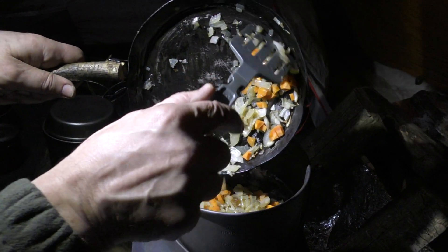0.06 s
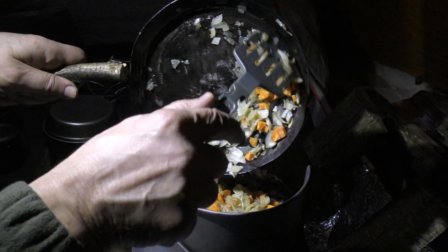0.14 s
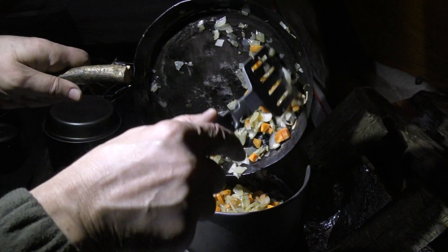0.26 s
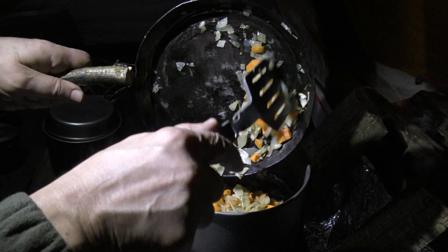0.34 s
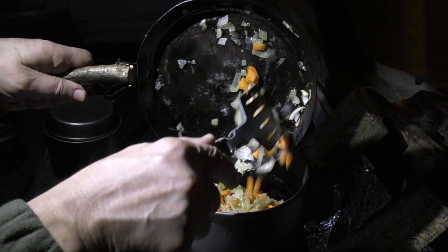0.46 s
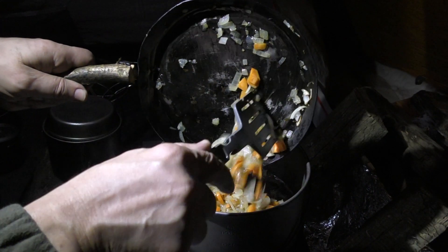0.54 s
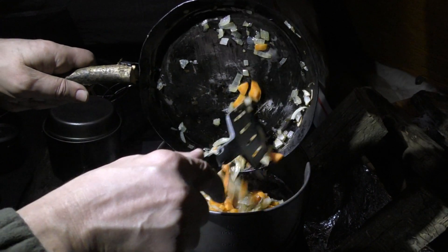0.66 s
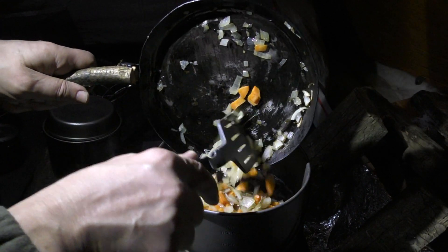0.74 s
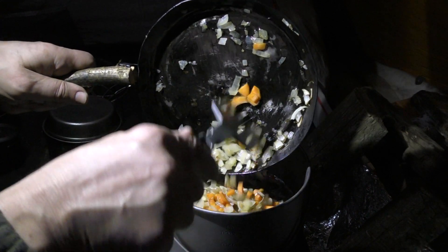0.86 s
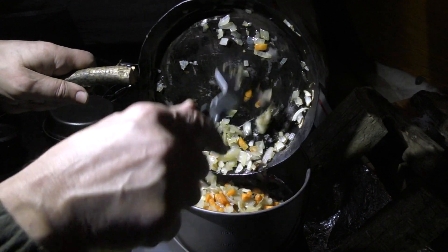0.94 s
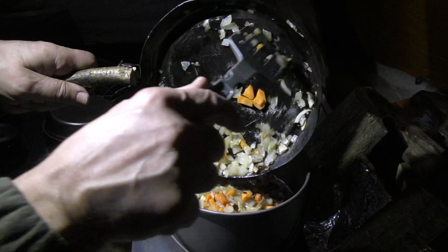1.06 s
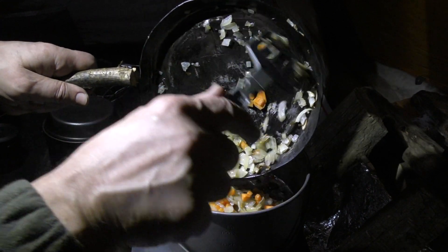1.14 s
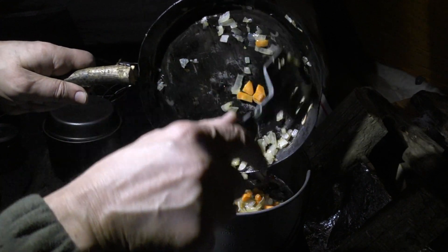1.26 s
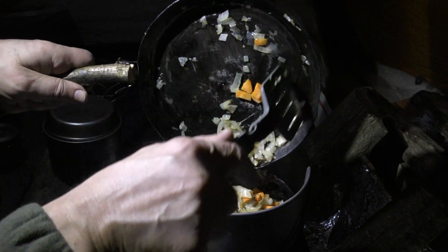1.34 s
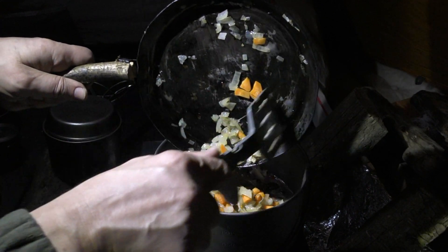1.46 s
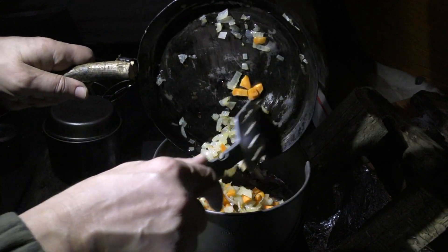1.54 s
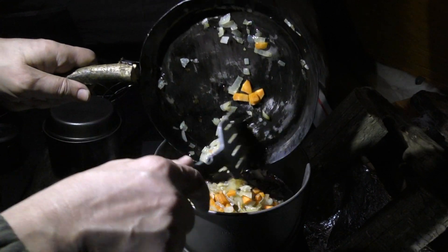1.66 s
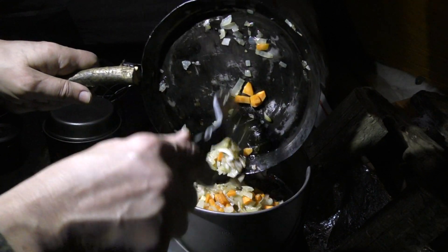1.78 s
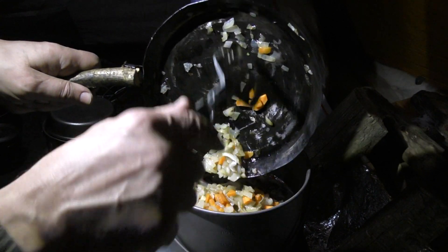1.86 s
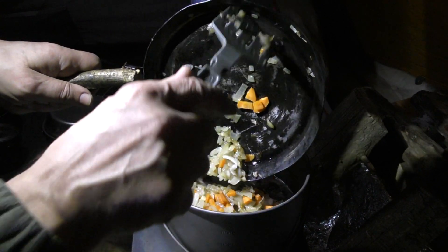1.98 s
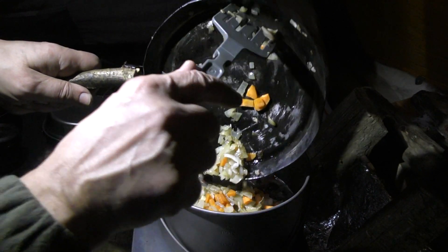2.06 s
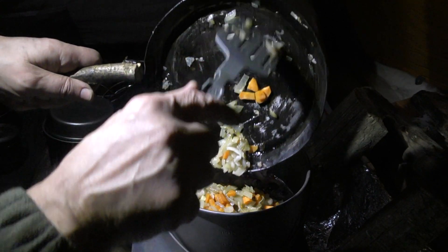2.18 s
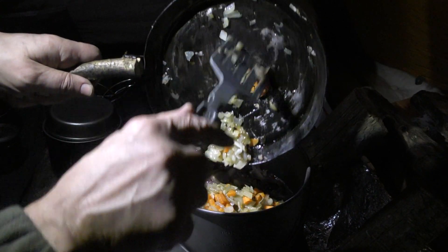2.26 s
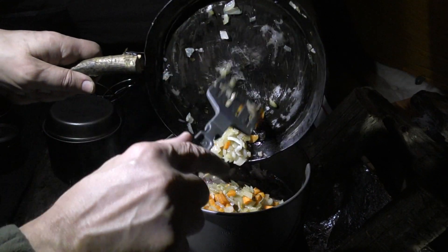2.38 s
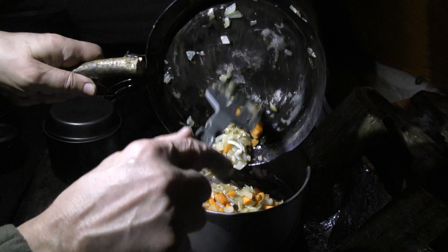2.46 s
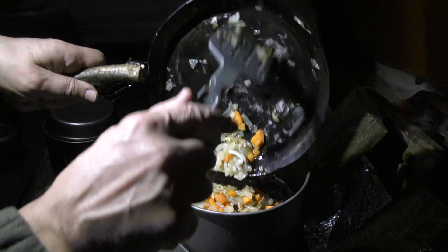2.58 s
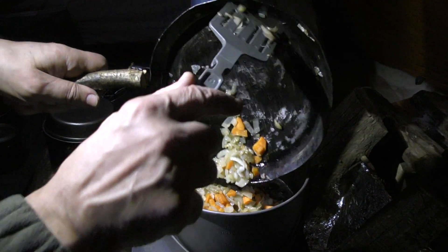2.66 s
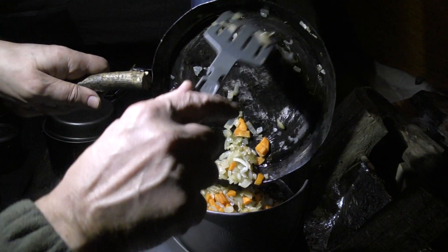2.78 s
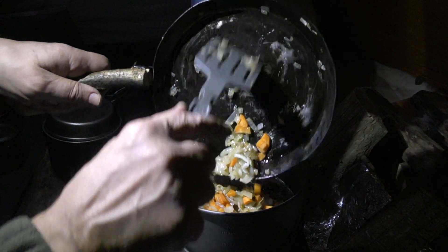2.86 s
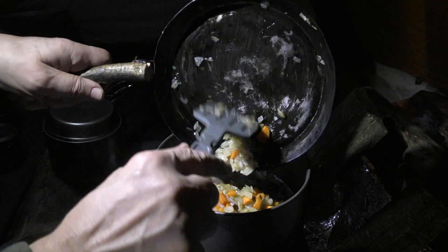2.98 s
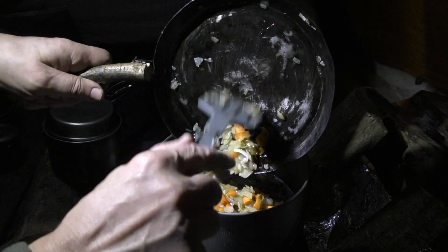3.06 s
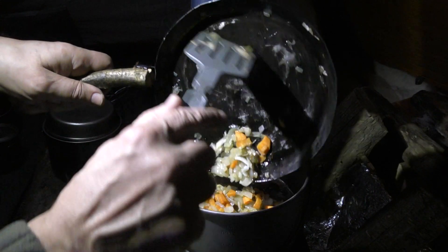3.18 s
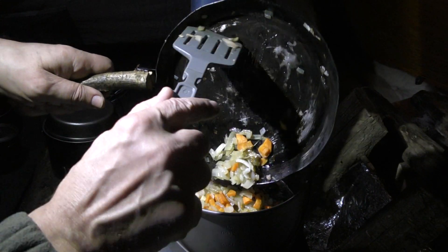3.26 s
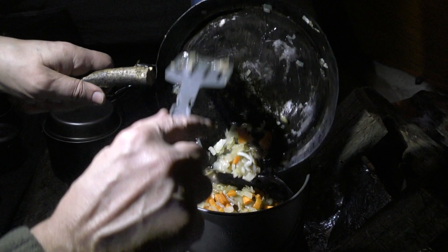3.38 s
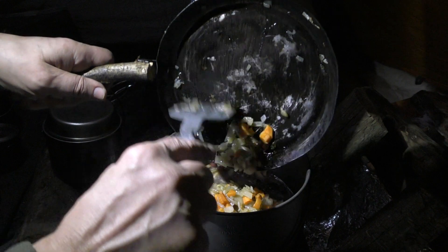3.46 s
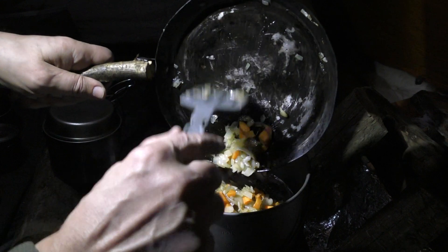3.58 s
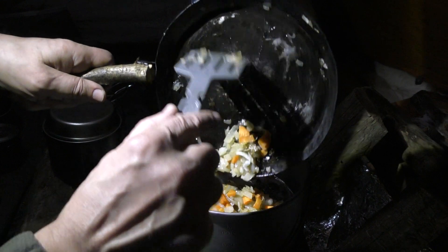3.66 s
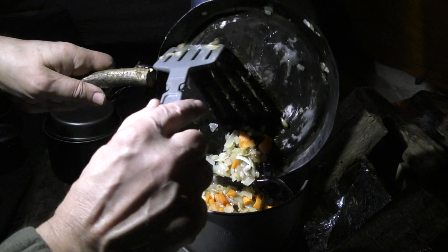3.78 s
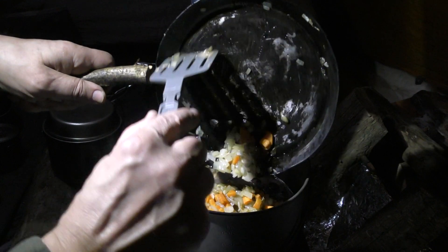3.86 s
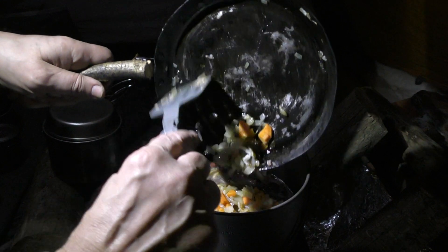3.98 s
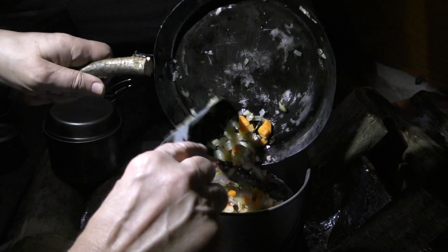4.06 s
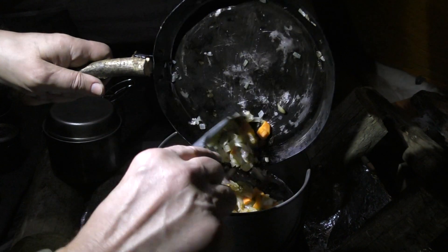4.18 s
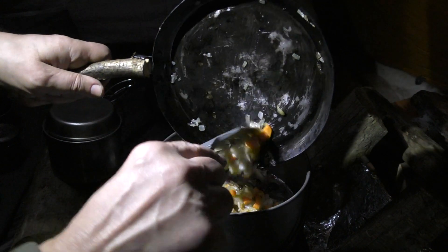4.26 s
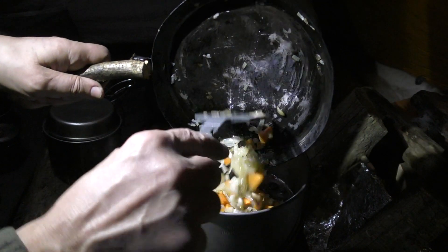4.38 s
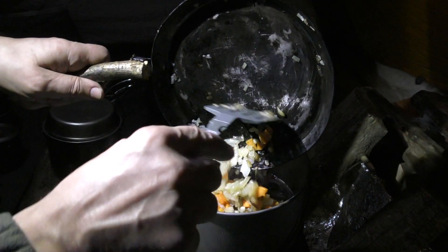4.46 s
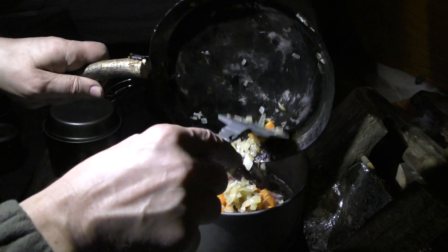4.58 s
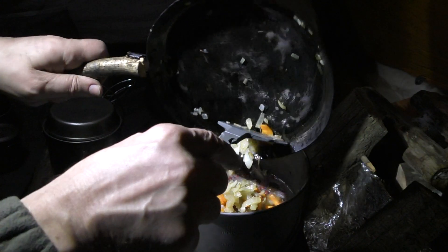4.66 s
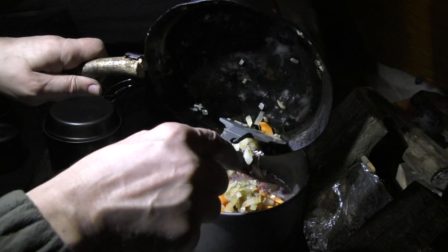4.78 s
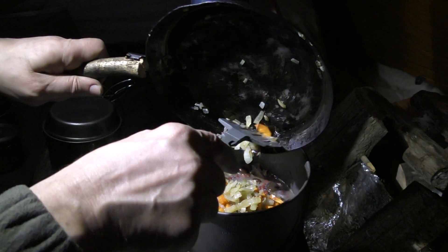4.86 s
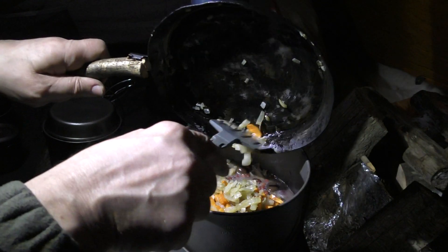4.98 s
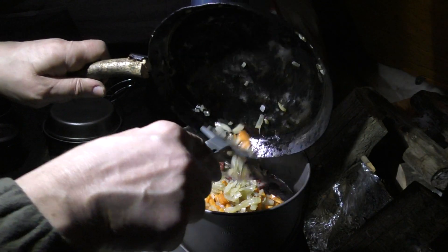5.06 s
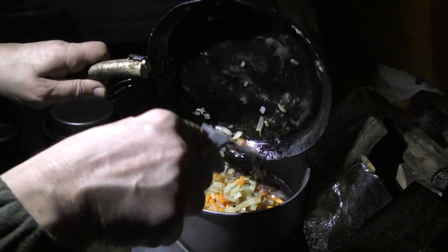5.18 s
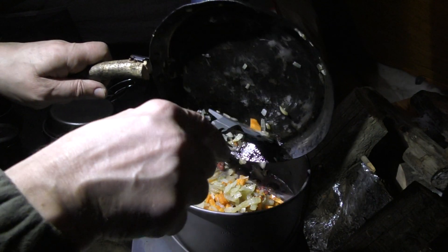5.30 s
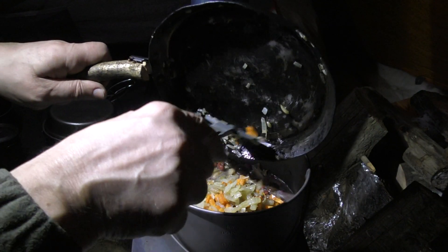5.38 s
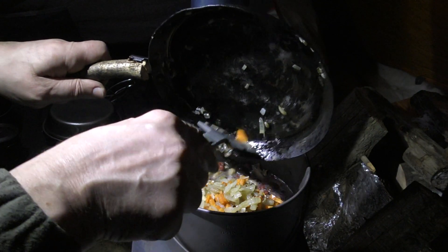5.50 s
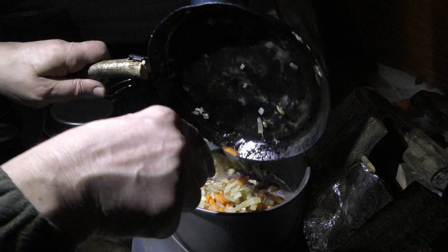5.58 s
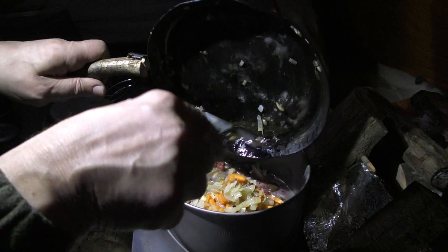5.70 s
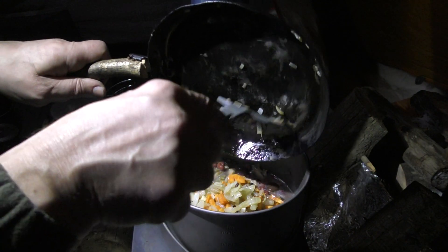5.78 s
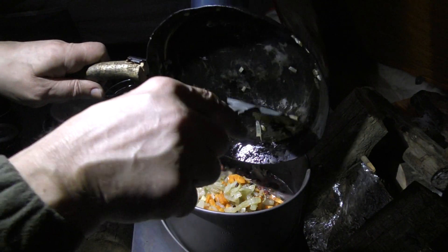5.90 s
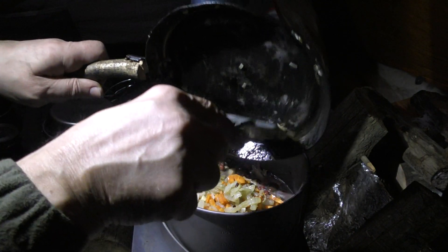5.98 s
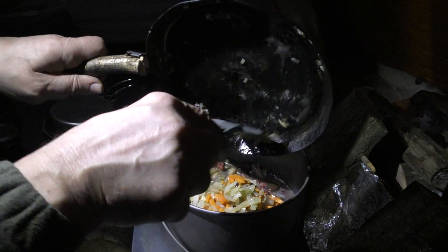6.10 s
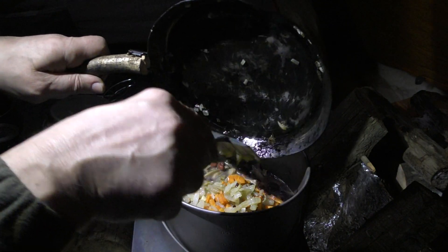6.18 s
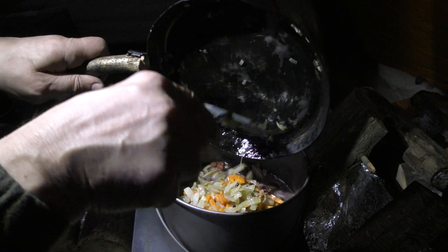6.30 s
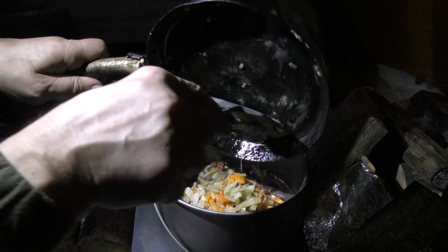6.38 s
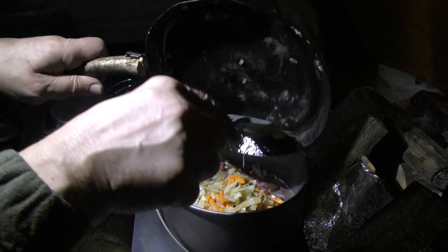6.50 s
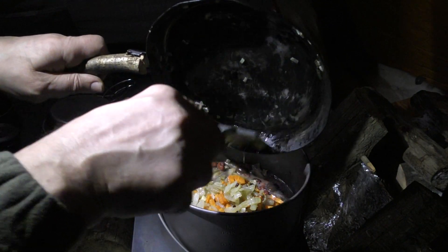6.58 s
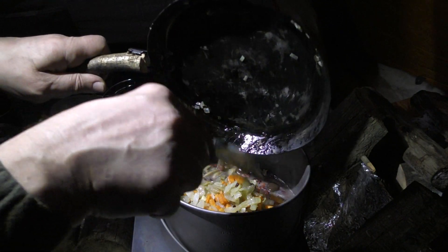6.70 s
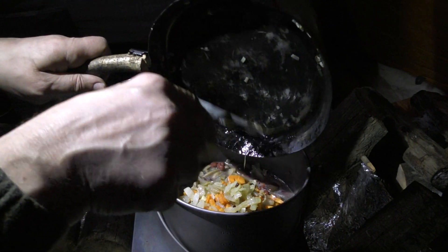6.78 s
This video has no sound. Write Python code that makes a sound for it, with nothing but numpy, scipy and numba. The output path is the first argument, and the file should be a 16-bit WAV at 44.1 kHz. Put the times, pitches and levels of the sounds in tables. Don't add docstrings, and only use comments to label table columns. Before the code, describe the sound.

Inside a tent, close and dry, a spatula empties a thin metal frying pan. From 0 to 2 seconds there are only faint taps and soft, grainy pushes through food, at about 0.4, 0.7 and 1.5, with one clearer knock at 1.2. From 2.0 hard work begins: knocks, then gritty scrapes swelling and easing at 2.2 and 2.4, a clank at 2.66 with a scrape to 3.0, the loudest sharp clanks at 3.23 and 3.75 with rough scrapes after each, and another at 4.5 with a scrape and a short ring. Between 4.8 and 5.6 it eases to a knock, small ticks and light rubs. From 5.86 bright knocks and shorter scrapes return at 6.0, 6.4 and 6.5, the emptier pan ringing thinly until the end near 6.8. Low rumble, faint hiss and tiny fat crackles stay beneath.

```python
import sys
import numpy as np
from scipy import signal
from scipy.io import wavfile
from scipy.ndimage import uniform_filter1d
from numba import njit

SR = 44100
rng = np.random.default_rng(int(sys.argv[2]) if len(sys.argv) > 2 else 0)


def wrap_up_sound(samples):
    columns = np.atleast_2d(samples).T
    tamed = np.clip(columns, -1, 1)
    steps = np.round(tamed * 32767).astype(np.int16)
    wavfile.write(sys.argv[1], SR, steps)


def ratio_of_db(decibels):
    return 10 ** (np.asarray(decibels, float) / 20)


N = 301627
HOP = 64

# start in seconds, blow peak
# in dB, then belly, edge and thud in dB relative to it.
KNOCKS = [(0.114, -31, 3.5, -3, -16), (0.145, -26.5, -6, -11, -6), (0.2152, -26, -1, -9, -9),
          (1.0893, -39, -1, -16, 4), (1.1195, -49, 0, -18, -28), (1.1947, -13.5, 1.5, -11.5, -4.5),
          (2.0074, -14, 4, -10, -0.5), (2.0895, -13, 0, -17, -4), (2.6615, -2, 5, -10.5, -14.5),
          (2.7038, -19, 14, -10.5, 9), (3.2327, 7, -5, -15.5, -17.5), (3.7505, 9, -8.5, -20, -18),
          (4.4919, 0.5, -2.5, -25, -23), (4.8251, -8, 7, -14.5, -8), (4.874, -27, 14, -10, -24),
          (5.323, -28, -24, -22.5, -32), (5.8605, -3, -6.5, -14, -40), (6.0132, 1.5, -1, -17, -9.5),
          (6.378, -1.5, -15, -11.5, -36), (6.5084, -8.5, 5, -16.5, -6), (6.5853, -25.5, 1, -23, -13.5),
          (2.785, -26.5, 12, -18, -17), (3.2772, -31, 10.5, -22, -20), (2.026, -26.5, 13, 0.5, 9)]
# start in seconds, blow peak in dB, belly in dB relative to it.
JOLTS = [(2.3484, -12, 0), (2.368, -16, 10), (2.8486, -0.5, -3), (3.3776, -7.5, -2), (3.7962, -20, -15),
         (3.888, -9.5, -22), (3.9922, -5, 2), (4.0512, -43, -4), (4.095, -27, 7), (4.5889, -13, -20),
         (5.9477, -8, -35)]
JOLT_EDGE_DB, JOLT_THUD_DB = -24, -24
# start in seconds, blow peak in dB, edge in dB relative.
TICKS = [
    (.1957, -29, -5),
    (1.042, -47.5, 10.5),
    (1.7488, -44.5, 8.5),
    (4.331, -41.5, 0),
    (4.376, -36, 3),
    (4.814, -15, -13),
    (5.2556, -38.5, 6.5),
    (5.4963, -38.5, 13.5),
    (5.5195, -44, 17),
    (6.291, -30, 4),
]
TICK_BELLY_DB, TICK_THUD_DB = -30, -19
LANDING_DAMP, LANDING_S = .13, .1

# peak, rise and fall in seconds, pressure in dB, belly in dB relative.
NUDGES = [(0.0, .01, 0.052, -44.5, 6), (.13, 0.037, 0.74, -53, 8.5), (.41, 0.14, 0.11, -28, -5.5),
          (0.466, 0.064, 0.064, -28, -9.5), (.56, 0.24, 0.067, -45, 5), (.66, 0.062, 0.1, -35, 2),
          (0.733, 0.23, 0.046, -38, -0.5), (1.12, 0.0058, 0.063, -37.5, 2), (1.299, .11, 0.024, -37.5, 10),
          (1.38, 0.27, 0.037, -46, 9.5), (1.475, 0.057, .08, -27, 9), (1.58, 0.36, 0.088, -34, 8.5),
          (4.848, 0.0033, 0.15, -43.5, 4.5), (5.0, 0.45, 0.14, -55.5, -5), (5.098, 0.13, 0.033, -45.5, -16),
          (5.323, 0.0046, 0.069, -33, -2.5), (5.374, 0.055, 0.065, -25.5, -15),
          (5.418, 0.048, 0.0082, -29, 2), (5.55, 0.021, 0.046, -52, 1), (5.593, 0.088, 0.0046, -41.5, -11)]
# peak, rise and fall in seconds, pressure in dB, belly in dB relative.
SCRAPES = [(2.022, 0.0037, 0.019, -37, 15), (2.214, 0.089, .12, -19.5, -8.5), (2.39, 0.093, .055, -15, 1),
           (2.692, 0.0039, 0.045, -41.5, 18.5), (2.867, 0.086, 0.11, -12, -6),
           (2.953, 0.061, 0.043, -15.5, 0.5), (2.979, 0.052, 0.016, -17, -11), (3.37, 0.075, .08, -37, -1),
           (3.424, 0.097, 0.085, -9.5, -5), (3.504, 0.1, 0.025, -18.5, 0.5),
           (3.80, 0.0085, 0.086, -43, 16.5), (3.901, 0.13, 0.36, -30.5, 3), (4.022, 0.12, 0.049, -13, -2),
           (4.061, 0.027, .12, -12, 2), (4.165, 0.099, 0.032, -38, 5), (4.518, 0.0046, 0.19, -38, 1.5),
           (4.607, 0.051, 0.066, -13.5, -8), (5.876, 0.0095, 0.15, -30.5, -5),
           (5.965, 0.061, 0.082, -13, -13.5), (6.055, 0.0051, .07, -45, 3), (6.168, 0.1, 0.035, -27, -2.5),
           (6.396, 0.011, 0.17, -29.5, -9), (6.497, 0.1, 0.028, -20, -8.5),
           (6.632, 0.059, 0.025, -23, -1.5)]
EASE_DB, EASE_BEND = 25, 1.48
BELLY_PER_DB, EDGE_DB, EDGE_PER_DB = 0.1909, -8.5, 0.2223
PRESSED_DB = -56
# time in seconds, drop in dB, length in seconds.
SKIPS = [
    (0.445, 6, .008),
    (.477, 10, 0.0048),
    (0.686, 10, 0.0074),
    (1.499, 5.5, 0.011),
    (1.535, 1, 0.017),
    (2.903, 1, 0.01),
    (3.401, 6.5, .004),
    (3.459, 1, 0.0019),
    (4.047, 8, 0.0051),
    (4.088, 9, 0.02),
]
# time in seconds, favoured rim mode in Hz, favoured body mode in Hz, tilt as extra edge hiss in dB.
PLACE = [(0, 865, 1860, 1), (.45, 960, 1850, -1), (1.3, 770, 1930, 3), (1.6, 770, 1780, 3.5),
         (2.2, 1094, 1750, 3), (2.33, 1245, 1640, 0), (2.43, 967, 1512, -3), (2.82, 1256, 2020, 0.5),
         (2.95, 1074, 1550, 5.5), (3.4, 977, 1885, 3.5), (3.8, 844, 1674, -1), (4.1, 1000, 1720, -0.5),
         (4.55, 990, 2060, -1.5), (5.1, 960, 2490, 7.5), (5.35, 950, 1950, 1.5), (5.9, 990, 2410, 3.5),
         (6.12, 985, 1770, 0.5), (6.45, 1020, 2110, -0.5)]
CENTRE_HZ, LEAN_DB = 762, 3.5

PAN_HZ = [330, 460, 768, 823, 964, 1010, 1174, 1478, 1742, 1970, 2090, 2186, 2388, 2540, 2815, 2930, 3038,
          3292, 3480, 3620, 3790, 4000, 4235, 4370, 4592, 5100, 5400, 5615, 5850, 6380]
# level in dB, time to fall 60 dB in seconds.
PAN = [(-14.5, 0.11), (0, 0.048), (9, 0.2), (6, 0.088), (-2.5, 0.99), (5, 0.072), (0, 0.54), (6.5, 0.23),
       (-4.5, 0.11), (-6.5, 0.18), (-0.5, 0.1), (-7, 0.27), (-4, .18), (-15, 0.13), (-18, 0.17), (0, 0.072),
       (4, 0.62), (4, 0.3), (-5.5, 0.081), (1.5, 0.15), (-3, .08), (-2.5, 0.12), (-22.5, 0.1), (0.5, 0.12),
       (-13, 0.28), (-8.5, 0.049), (-31.5, 0.067), (-7.5, 0.3), (-34, .1), (-45, 0.18)]
BAND_EDGES_HZ = [550, 1300, 4500]
MODE_SHARE = [.3, .95, .75, .2]
# time in seconds, damping from 0 to 1.
DAMPING = [
    (0, .28),
    (1.2, .17),
    (2, .24),
    (4.4, .2),
    (4.66, .12),
    (5.8, .16),
    (6.02, .04),
    (6.84, .04),
]
# frequency in Hz, level in dB per Hz.
CLATTER = [(90, -46), (250, -15), (450, -12), (650, -28.5), (800, -3), (1300, -10), (2200, 5), (5600, -9),
           (7500, -20), (10000, -18), (13500, -34.5), (15300, -31)]
CLATTER_T60 = [0.018, 0.017, 0.045, 0.046]
# start in seconds, peak in dB,
# frequency in Hz, time to fall 60 dB in seconds.
RINGS = [(4.492, -3.5, 2000, 0.038), (4.492, -16.5, 1130, .045), (3.233, -21, 2930, 0.11),
         (2.972, -19.5, 1174, 0.13), (3.509, -43, 960, 0.096), (4.649, -28.5, 950, 0.2),
         (4.65, -23, 1475, 0.11), (6.016, -35, 972, 0.94), (6.179, -31.5, 964, 0.38),
         (6.18, -27, 1955, 0.18), (6.51, -12.5, 2040, 0.1), (6.509, -21.5, 2385, 0.18),
         (6.508, -27, 1040, 0.23), (6.631, -22, 962, 0.42), (6.634, -35, 2300, 0.23),
         (6.632, -24.5, 3300, 0.12)]
# frequency in Hz, level in dB per Hz.
AIR = [(12, -19), (20, 11.5), (58, -9.5), (224, -18.5), (361, -20.5), (566, -23.5), (1050, -32.5),
       (1240, -33), (2180, -35), (3940, -35.5), (4930, -33.5), (6710, -40), (13600, -46.5), (15200, -62),
       (16500, -79)]
AIR_DB = -45
EDGE_HZ = 15700


def pan_modes(rub, blow):
    hz, (db, t60) = np.array(PAN_HZ), np.transpose(PAN)
    band, out = np.digitize(hz, BAND_EDGES_HZ), np.zeros((4, N))
    (t, pressure_db, _), belly_hz = pressure(), belly_tone()
    best_hz = [belly_hz, belly_hz, placed(t, column=2), belly_hz]
    focus_octaves = (np.inf, .1, .5, np.inf)
    away = np.array([np.log2(f / best_hz[b]) / focus_octaves[b] for f, b in zip(hz, band)])
    landed = sum((t > k[0] - .003) * np.exp(-abs(t - k[0]) / LANDING_S) for k in KNOCKS if k[0] < 6)
    hard = sum(abs(t - k[0] - .002) < .005 for k in KNOCKS if k[1] > -9)
    focus_db = 16 - 9 * (band[:, None] < 2) * hard
    reach = ratio_of_db(db[:, None] - focus_db * np.tanh(away ** 2) + 3.6 * wander(count=len(PAN), per_s=22))
    pressed = pressure_db > PRESSED_DB
    damping = np.clip(np.interp(t, *np.transpose(DAMPING)) + LANDING_DAMP * landed, 0, 1)
    width_hz = (120 + 85 * pressed) * damping
    for k, b in enumerate(band):
        share = reach[k] * np.sqrt(MODE_SHARE[b] / np.sum(reach[band == b] ** 2, 0))
        turn, fade = np.exp(2j * np.pi * hz[k] / SR), ratio_of_db(-60 / t60[k] / SR)
        damp = np.exp(-np.pi * width_hz * (hz[k] / 2000) ** .6 / SR)
        out[b] += ring(rub[b], .5 * blow[b], share, turn, fade, damp, HOP)
    lows_hz = [250, 700] + BAND_EDGES_HZ[1:]
    cuts = [signal.butter(5, .95 * low, "high", fs=SR, output="sos") for low in lows_hz]
    return sum(signal.sosfilt(cut, x) for cut, x in zip(cuts, out))


@njit
def ring(rub, blow, reach, turn, fade, damp, hop):
    out, state = np.zeros(len(rub)), 0j
    for i in range(len(rub)):
        r = fade * damp[i // hop]
        state = state * turn * r + reach[i // hop] * (rub[i] * np.sqrt(2 - 2 * r * r) + blow[i])
        out[i] = state.imag
    return out


def drives():
    t, blow, shake = np.arange(N) / SR, np.zeros((4, N)), np.zeros((4, N))
    at, db, belly_db = pressure()
    thud_db = 0.5 * np.maximum(db, belly_db) - 30.5 + 5.9 * (at < 1.8)
    edge_db = db + EDGE_DB + placed(at, column=3) - EDGE_PER_DB * np.maximum(db + 35.5, -32)
    rub = np.array([np.interp(t, at, ratio_of_db(c)) for c in (thud_db, belly_db, db, edge_db)])
    u = np.arange(3000) / SR
    fades = ratio_of_db(-60 * u / np.array(CLATTER_T60)[:, None]) * (1 - np.exp(-u / .0003))
    chances = rng.standard_normal((len(blows()), 3000))
    for (s, db, belly, edge, thud), chance in zip(blows(), chances):
        start = round(s * SR)
        size = ratio_of_db(db + np.array([[min(thud, 9)], [belly], [0], [edge]]))
        bounce = (chance + 2.76 * (u == 0)) * np.exp(-u / 0.0007)
        blow[:, start:][:, :3000] += size * bounce / np.linalg.norm(bounce)
        shake[:, start:][:, :3000] += size * chance * fades * ratio_of_db(-5)
    return rub * grit(), blow, shake


def grit():
    struck = rng.random(N) < 900 / SR
    slips = struck * ratio_of_db(3 * np.minimum(rng.exponential(1, N), 4)) * rng.choice([-1, 1], N)
    t = np.arange(0, N + HOP, HOP) / SR
    skips_db = sum(db * np.exp(-((t - s) / length) ** 2) for s, db, length in SKIPS)
    clumps = np.repeat(ratio_of_db(2.2 * wander(count=1, per_s=90)[0] - skips_db), HOP)[:N]
    return evened((evened(slips) + 0.93 * rng.standard_normal(N)) * clumps)


def blows():
    jolts = [(s, db, belly, JOLT_EDGE_DB, JOLT_THUD_DB) for s, db, belly in JOLTS]
    ticks = [(s, db, TICK_BELLY_DB, edge, TICK_THUD_DB) for s, db, edge in TICKS]
    return KNOCKS + jolts + ticks


def pressure():
    t = np.arange(0, N + HOP, HOP) / SR
    peak, rise, fall, db, belly = np.transpose(NUDGES + SCRAPES)[:, :, None]
    away = np.where(t < peak, (peak - t) / abs(rise), (t - peak) / abs(fall))
    eased = EASE_DB * np.minimum(away, 4) ** EASE_BEND
    body_db = 10 * np.log10(np.sum(ratio_of_db(db - eased) ** 2, 0))
    belly_db = 10 * np.log10(np.sum(ratio_of_db(db + belly - (1.5 - BELLY_PER_DB) * eased) ** 2, 0))
    return t, body_db, belly_db


def placed(t, column):
    return np.interp(t, np.transpose(PLACE)[0], np.transpose(PLACE)[column])


def belly_tone():
    t, body_db, belly_db = pressure()
    lean = belly_db - body_db
    for s, db, belly, edge, thud in KNOCKS:
        lean = np.where((t > s - .003) & (t < s + .012), belly + 11.0, lean)
    rim_hz = placed(t, column=1)
    return rim_hz + (CENTRE_HZ - rim_hz) / (1 + np.exp(-np.clip((lean - 2.5) / LEAN_DB, -9, 9)))


def clatter(rub, shake):
    hz = np.fft.rfftfreq(4096, 1 / SR)
    below = [0] + [1 / (1 + (hz / edge) ** 8) for edge in BAND_EDGES_HZ] + [1]
    out = np.zeros(N)
    for b in range(4):
        colour = evened(ratio_of_db(read(CLATTER, hz)) * np.sqrt(np.clip(below[b + 1] - below[b], 0, 1)))
        force = (rub[b] + shake[b]) * np.sqrt(1 - MODE_SHARE[b])
        out += signal.oaconvolve(force, causal(colour))[:N]
    z = signal.stft(out, nperseg=128, noverlap=64)[2]
    patches = rng.standard_normal(z.shape[::-1]).T
    patches = uniform_filter1d(uniform_filter1d(patches, 4, 0), 20, 1)
    patches = evened(uniform_filter1d(patches, 10, 1))
    return signal.istft(z * ratio_of_db(4.0 * patches - 2), nperseg=128, noverlap=64)[1][:N]


def ring_out():
    out, t = np.zeros(N + SR), np.arange(SR) / SR
    for s, db, hz, t60 in RINGS:
        swell = 1 - np.exp(-t / 0.0033)
        out[round(s * SR):][:SR] += ratio_of_db(db - 60 * t / t60) * swell * np.sin(2 * np.pi * hz * t)
    return out[:N]


def air():
    frames, hz = N // 256 + 5, np.fft.rfftfreq(1024, 1 / SR)
    a, b, patches = rng.standard_normal((frames, 513, 3)).T
    patches = evened(uniform_filter1d(uniform_filter1d(patches, 30, 0), 10, 1))
    level_db = read(AIR, hz)[:, None] + 1.7 * patches * np.minimum(hz / 900, 1)[:, None]
    bed = signal.istft((a + 1j * b) * ratio_of_db(level_db), nperseg=1024, noverlap=768)[1][:N]
    pops = (rng.random(N) < 25 / SR) * ratio_of_db(-46 + 2.1 * rng.exponential(1, N))
    t = np.arange(300) / SR
    pop = np.diff(rng.standard_normal(301)) * np.exp(-t / 0.0031)
    return ratio_of_db(AIR_DB) * evened(bed) + signal.oaconvolve(pops, pop / abs(pop).max())[:N]


def evened(x):
    return x / np.sqrt(np.mean(x ** 2) + 1e-20)


def read(points, hz):
    f, value = np.transpose(points)
    return np.interp(np.log(hz + 1), np.log(f + 1), value)


def wander(count, per_s):
    knots = rng.standard_normal((count, int(N / SR * per_s) + 3))
    at = np.arange(0, N + HOP, HOP) / SR * per_s
    return np.array([np.interp(at, np.arange(len(k)), k) for k in knots]) * 1.2


def causal(gain):
    log_gain = np.log(np.maximum(np.r_[gain, gain[-2:0:-1]], 1e-4))
    return np.fft.ifft(np.exp(np.conj(signal.hilbert(log_gain)))).real[:len(gain)]


def scene():
    rub, blow, shake = drives()
    return (pan_modes(rub, blow) + clatter(rub, shake) + ring_out() + air())[None]


def low_pass(x):
    return signal.sosfilt(signal.butter(12, 16850, fs=SR, output="sos"), x)


def record(dry):
    limited = .8 * np.tanh(dry / .8)
    edge = signal.firwin(255, EDGE_HZ, window=("kaiser", 5), fs=SR)
    return low_pass(signal.oaconvolve(limited, edge[None], "same"))


dry = scene()
out = record(dry)
wrap_up_sound(out)
```